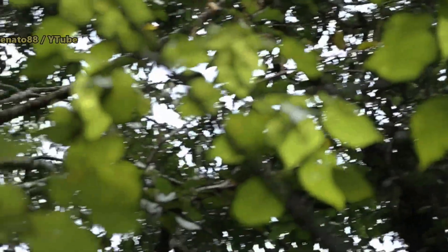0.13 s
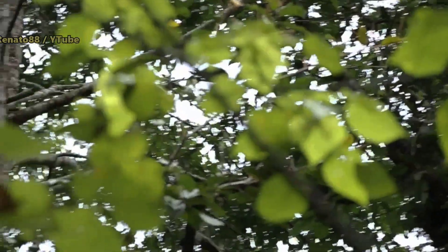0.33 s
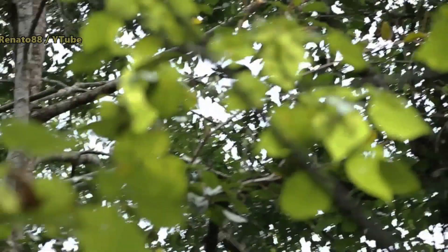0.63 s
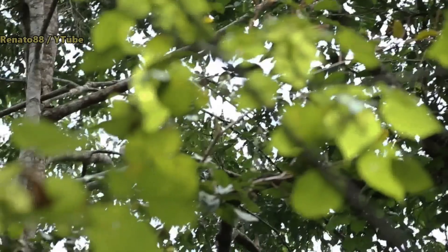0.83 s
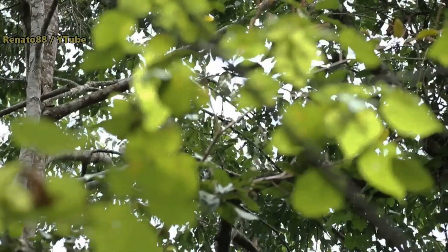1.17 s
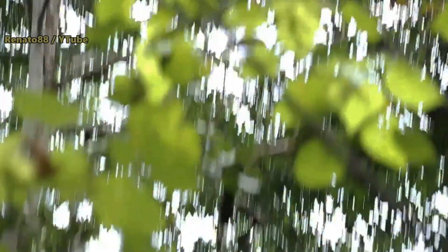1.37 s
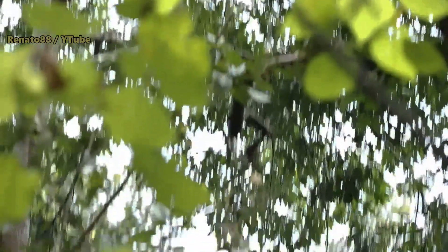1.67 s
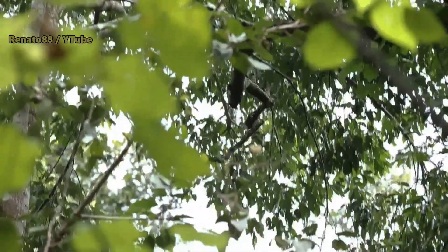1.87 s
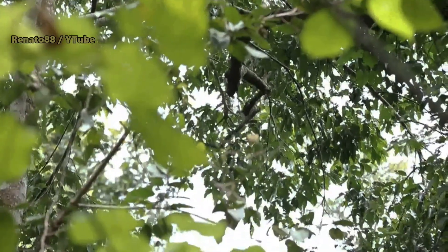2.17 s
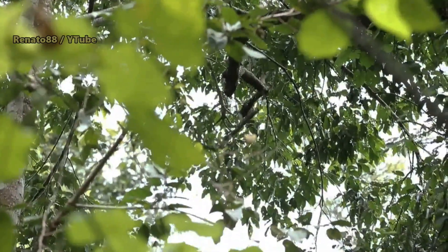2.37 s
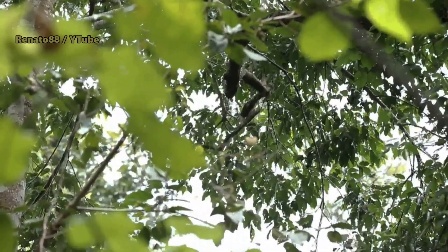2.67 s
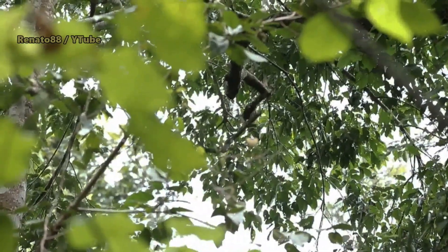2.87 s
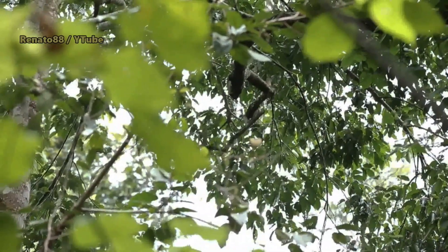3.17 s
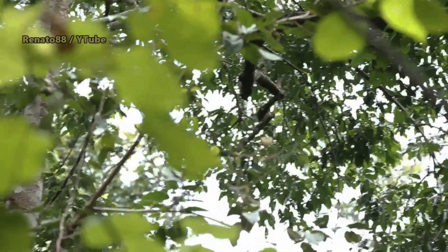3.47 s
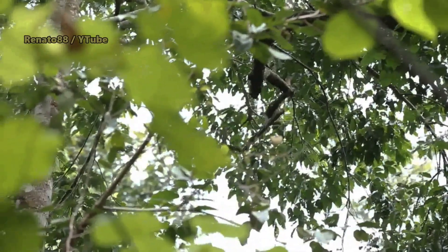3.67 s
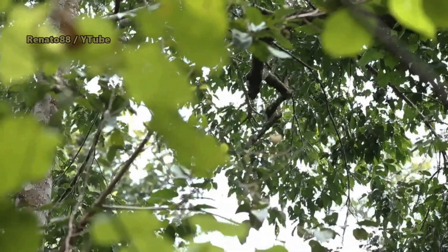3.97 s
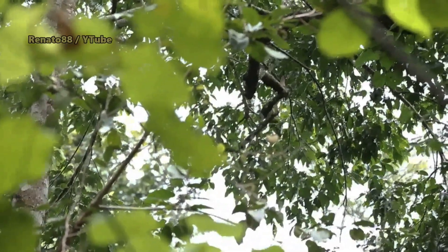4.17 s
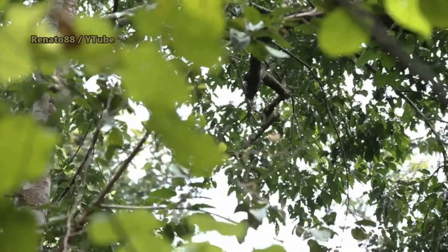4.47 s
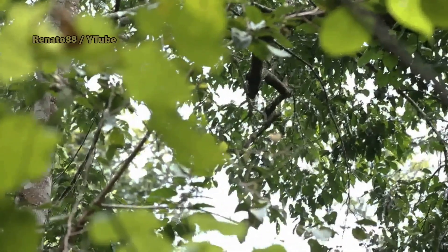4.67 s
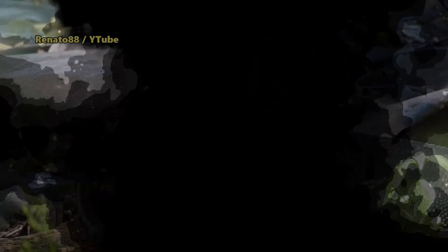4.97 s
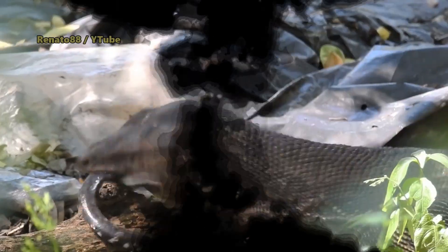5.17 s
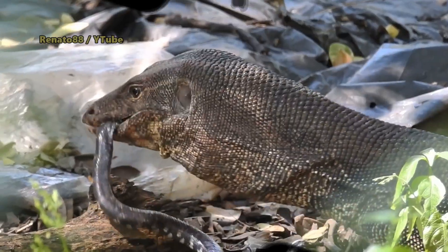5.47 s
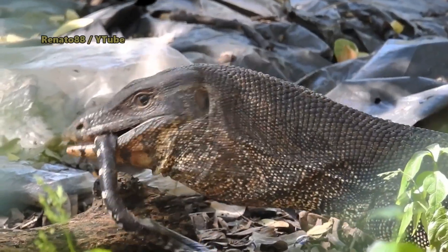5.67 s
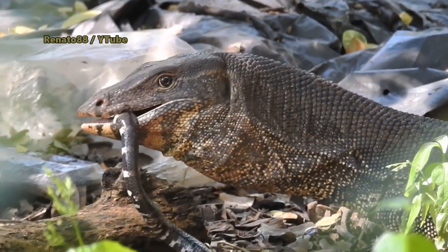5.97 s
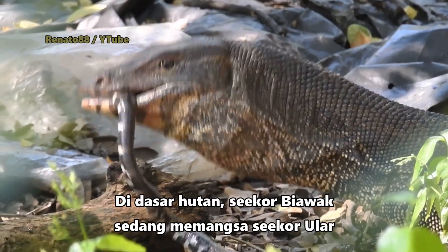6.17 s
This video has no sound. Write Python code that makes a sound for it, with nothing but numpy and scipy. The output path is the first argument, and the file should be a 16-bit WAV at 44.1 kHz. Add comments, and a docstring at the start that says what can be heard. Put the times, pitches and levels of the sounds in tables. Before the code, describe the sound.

Four short rising whoops and two long gibbon hoots ring through a forest while crickets chirp and twigs tick.

```python
"""In a forest, a gibbon up in the trees gives four short rising whoops and two long hoots. Its voice is
an almost pure tone that echoes on among the trunks and swaying leaves. One near cricket chirps with its
wings six times a second over a far chorus of its kind. Thin insect whistles, a high hiss and a far bird
sound behind them. Leaves rustle, twigs tick and snap, something small and hollow is knocked close by,
and wind rumbles low under it all."""
import sys
import numpy as np
from scipy import signal
from scipy.io import wavfile

SR = 44100
rng = np.random.default_rng(int(sys.argv[2]) if len(sys.argv) > 2 else 0)


def pcm_store(signal):
    """Save signal as 16-bit PCM."""
    levels = np.round(np.clip(np.atleast_2d(signal), -1, 1) * 32767)
    wavfile.write(sys.argv[1], SR, levels.astype(np.int16).T)


N = 278271

# whoops: (start [s], length [s], start pitch [Hz], top pitch [Hz], level [dB],
# 2nd harmonic [dB], 3rd harmonic [dB]); harmonics are fainter tones at 2 and 3 times the pitch
WHOOPS = [(0.274, 0.082, 586.7, 765, -30, -19, -15), (0.589, 0.087, 562.3, 775, -32, -27, -13),
          (1, .081, 540.5, 720, -31.5, -32, -41), (1.301, 0.095, 546, 692, -30.5, -27, -35)]
# how a whoop swells: (share of its length [0-1], level change [dB], lift from the open mouth [dB])
WHOOP_SWELL = [(0, -11, -10), (.35, -2, -7), (.62, 0, 1), (.78, -6, -4), (1, -14, -10)]
# one list for each hoot: (time [s], pitch [Hz], level [dB], lift from the open mouth [dB]);
# the level holds the swells and dips heard as echoes overlap
HOOTS = [
    [(1.517, 556, -42, 7), (1.545, 554, -25.5, 3), (1.617, 703, -36.5, -4), (1.69, 650.7, -27, -4),
     (1.86, 713.2, -29.5, 1.5), (1.97, 685.4, -33, -2), (2.0, 678.6, -21.5, -14), (2.07, 688.5, -30, 9.5),
     (2.14, 744, -22, -11), (2.2, 735, -25, -9), (2.25, 713, -28.5, -3)],
    [(2.717, 545, -44, -2), (2.755, 552, -31.5, -5), (2.873, 790, -18.5, 1), (2.895, 858, -28, -2),
     (2.98, 847.6, -19, 3), (3.035, 777.5, -16.5, 0), (3.1, 780, -20, 0), (3.17, 755.3, -21.5, 3.5),
     (3.22, 713, -27, 2), (3.36, 533, -37, 0), (3.42, 542, -47.5, -5)],
]
# each hoot's harmonics before the mouth lifts them: (2nd harmonic [dB], 3rd harmonic [dB])
HOOT_HARMONICS = [(-27, -33), (-31, -39)]
def gibbon():
    """Whoops slide up ever faster; hoots glide in pitch, and swell and dip as echoes overlap."""
    progress = np.linspace(0, 1, num=12)
    share, swell_db, mouth_db = np.transpose(WHOOP_SWELL)
    swell = np.interp(progress, share, swell_db)
    mouth = np.interp(progress, share, mouth_db)
    whoops, harmonics = [], []
    for start, length, low_hz, top_hz, db, second_db, third_db in WHOOPS:
        pitch = low_hz + (top_hz - low_hz) * progress ** 1.81
        whoops.append(np.transpose([start + length * progress, pitch, db + swell, mouth]))
        harmonics.append((second_db, third_db))
    return voice(whoops + HOOTS, harmonics + HOOT_HARMONICS, fade_s=.01, waver_db=1.5)


def voice(calls, harmonics, fade_s, waver_db):
    """Almost pure notes: an open mouth makes the harmonics louder, and moving air makes them waver."""
    out, t = np.zeros(N), np.arange(N) / SR
    flutter_db = 4.6 * drift(29)
    for rows, (second_db, third_db) in zip(calls, harmonics):
        times, hz, db, mouth_db = np.transpose(rows)
        start, end = times[0] - fade_s, times[-1] + fade_s
        on = (t > start) & (t < end)
        fade = fade_ends(t[on], start, end, fade_s)
        phase = 2 * np.pi * np.cumsum(np.interp(t[on], times, hz)) / SR
        upper_tones = amp(second_db) * np.sin(2 * phase) + amp(third_db) * np.sin(3 * phase)
        lift = amp(np.interp(t[on], times, mouth_db) + flutter_db[on])
        tone = np.sin(phase) + lift * upper_tones
        out[on] += np.sqrt(2) * fade * amp(np.interp(t[on], times, db)) * tone
    return out * amp(waver_db * drift(30))


# the middle of each chirp: (time [s])
CHIRP_TIMES = [0.099, 0.267, 0.4396, 0.6208, 0.8025, 0.9856, 1.146, 1.3107, 1.476, 1.6543, 1.829, 1.997,
               2.171, 2.342, 2.5092, 2.6745, 2.8404, 3.0096, 3.1768, 3.3433, 3.512, 3.6855, 3.8711, 4.0411,
               4.2146, 4.382, 4.5499, 4.7175, 4.8868, 5.0446, 5.2086, 5.3725, 5.535, 5.6994, 5.8662, 6.0379,
               6.2137]
# wing strokes in a chirp: (time from its middle [s], pitch [Hz], relative level [dB], length [s])
WING_STROKES = [(-.016, 5260, -18, 0.0067), (-.0125, 5370, -11.5, .005), (-.0095, 5030, -4.5, 0.0036),
                (-.002, 5370, -6, 0.012), (.0025, 5100, -10.5, 0.0061), (.0045, 4930, -8.5, 0.0066),
                (.010, 5000, -10, 0.0042)]
def near_cricket():
    """Each chirp is the same quick row of wing strokes, each a little off in strength, pitch and time."""
    out = np.zeros(N)
    chance = rng.standard_normal((len(CHIRP_TIMES), len(WING_STROKES), 3))
    for time, nudges in zip(CHIRP_TIMES, chance):
        chirp_db = -22.5 - 0.33 * time   # the chirps slowly get quieter
        for (offset, hz, db, length), (louder, higher, later) in zip(WING_STROKES, nudges):
            n = int(length * SR)
            at = int((time + offset + 0.00028 * later) * SR)
            tone = np.sin(2 * np.pi * hz * (1 + 0.0082 * higher) * np.arange(n) / SR)
            out[at:at + n] += amp(chirp_db + db + 1.1 * louder) * np.hanning(n) * tone
    return out + amp(-6.5) * forest_echo(out)


# groups of far crickets: (pitch [Hz], pitch spread [Hz], relative level [dB])
CRICKET_GROUPS = [(4585, 390, -0.5), (4840, 280, -1.5), (5080, 150, -4.5), (5385, 320, -2.5)]
def far_crickets(strokes_per_s=1700):
    """Many random strokes of uneven strength, each making a wing's ring swell and die away."""
    out = 0
    for hz, width_hz, db in CRICKET_GROUPS:
        rate = strokes_per_s / len(CRICKET_GROUPS) * amp(2.5 * drift(7))
        happens = rng.random(N) < rate / SR
        strength = amp(1.3 * np.minimum(rng.exponential(1, N), 4))
        strokes = happens * strength * rng.choice([-1, 1], N)
        ring_s = np.log(1000) / (np.pi * width_hz)
        wings = ring(ring(strokes, hz, ring_s), hz, ring_s)   # ringing twice softens the start
        out += amp(db) * unit_level(wings)
    return amp(-45.5) * unit_level(out)


# knocks close by: (time [s], strength [dB])
KNOCKS = [(4.2425, -41), (4.319, -23), (4.3289, -36), (4.3912, -26), (4.4466, -24), (4.46, -45),
          (4.5448, -32.5), (4.5775, -44)]
# tones of the hollow body: (pitch [Hz], relative level [dB], ring time [s])
HOLLOW_TONES = [(1518, -2, 0.031), (1570, -6.5, 0.03), (1970, -8, 0.0094), (2630, -13, 0.013),
                (2980, -14, 0.01), (7160, -4, 0.0069)]
def knocks():
    """Every knock rings the same small hollow body, with a slightly different mix of its tones."""
    out = np.zeros(N)
    times, knock_db = np.transpose(KNOCKS)
    for hz, tone_db, ring_s in HOLLOW_TONES:
        clicks = np.zeros(N)
        clicks[(times * SR).astype(int)] = amp(knock_db + tone_db + rng.normal(0, 3.1, len(KNOCKS)))
        out += ring(clicks, hz, ring_s)
    return keep_band(out, 1050, 6000, order=3)   # a small body gives no bass, a soft hit no sharp highs


# dry ticks of twigs: (time [s], strength [dB], pitch [Hz], ring time [s])
TWIG_TICKS = [(.895, -42, 1900, .015), (1.2085, -32, 2700, .01), (1.212, -21.5, 2100, .014),
              (1.216, -28, 2300, .012), (1.465, -40, 1480, .02), (2.52, -42, 190, .08),
              (4.506, -39, 2400, .015), (4.61, -42, 3500, .01)]
# tones of one thin twig snapping: (pitch [Hz], strength [dB], ring time [s])
SNAP_TONES = [(1700, -33, .006), (9200, -24, .005), (10300, -24, .004), (11500, -24, .004),
              (12700, -26, .004), (14000, -31, .004)]
def twigs(snap_at_s=1.01):
    """Each tick rings its own twig for a moment; the bright snap rings several tones at once."""
    out = np.zeros(N)
    snap = [(snap_at_s, db, hz, ring_s) for hz, db, ring_s in SNAP_TONES]
    for time, db, hz, ring_s in TWIG_TICKS + snap:
        click = amp(db) * (np.arange(N) == int(time * SR))
        out += keep_band(ring(click, hz, ring_s), .7 * hz, 1.4 * hz)   # softens the start
    return out


# leaves stirring: (time [s], level [dB], brightness [dB per octave])
RUSTLE = [(0.0, -45, -2), (1.6, -46, -2.4), (1.93, -45.5, -1.9), (2.499, -48.5, -1.5), (3.19, -44.5, -2.5),
          (3.851, -50.5, 0.5), (4.27, -49, -4), (4.659, -47, -2)]
# the leaves' mix of lows and highs: (frequency [Hz], relative level [dB])
RUSTLE_COLOUR = [(200, -5.5), (500, -7.5), (1000, -3.5), (2000, -0.5), (3500, 2.5), (6000, -11), (8000, 0),
                 (11000, -23.5), (15500, -15)]
def leaf_rustle():
    """Stirring leaves make a noise that shifts in loudness and brightness, then stops short."""
    times, db, tilt = np.transpose(RUSTLE)
    t = np.arange(N) / SR
    level = amp(np.interp(t, times, db)) * (t < times[-1])
    return level * flickering_noise(RUSTLE_COLOUR, flicker_db=2.2, tilt=np.interp(t, times, tilt))


# brief brushes of leaves: (time of the peak [s], level [dB], length [s])
LEAF_BRUSHES = [(1.214, -47, 0.1), (1.834, -45.5, 0.13), (2.9, -47.5, 0.14), (3.242, -50, 0.21),
                (2.43, -66, 0.03), (4.244, -51, .02), (4.393, -49, 0.022)]
def leaf_brushes():
    """Brushing leaves make short swells of bright noise."""
    t = np.arange(N) / SR
    swell = sum(amp(db) * np.exp(-(2 * (t - time) / length) ** 2) for time, db, length in LEAF_BRUSHES)
    return swell * unit_level(keep_band(rng.standard_normal(N), 4000, 8700))


# the bird's tune: (time from its start [s], pitch [Hz], level change [dB])
BIRD_TUNE = [(0, 3650, 0), (.025, 3280, -1), (.1, 2620, -3), (.11, 2700, -9), (.145, 2950, -5)]
# each time it sings: (start [s], time stretch [factor], level [dB])
BIRD_CALLS = [(4.59, 1.3, -58), (5.355, 1.0, -54.5), (6.105, 1.3, -57.5)]
def far_bird():
    """A bird repeats one pure tune that falls and turns up, sometimes more drawn out."""
    calls = [[(start + stretch * time, hz, call_db + db, 0) for time, hz, db in BIRD_TUNE]
             for start, stretch, call_db in BIRD_CALLS]
    return voice(calls, harmonics=[(-40, -40)] * len(calls), fade_s=.01, waver_db=2.5)


# whistles: (start [s], end [s], start pitch [Hz], end pitch [Hz], level [dB], waver speed [Hz])
INSECT_WHISTLES = [(1.2, 4.4, 6880, 6930, -61, 55), (0, 6.3, 5980, 5970, -64, 20),
                   (0, .9, 6300, 6200, -58, 90), (0, .33, 9400, 8800, -58, 450),
                   (.16, .4, 8030, 8000, -59, 45), (.78, 1.17, 8350, 8350, -60, 45),
                   (2.1, 2.42, 7450, 7500, -59, 60), (2.13, 2.67, 7750, 7700, -59, 60),
                   (3.03, 3.27, 7700, 7900, -58, 150), (3.16, 3.4, 9200, 8700, -56, 350),
                   (3.33, 3.58, 8350, 8280, -57, 50), (3.4, 3.6, 7800, 7720, -55.5, 60),
                   (3.54, 3.82, 7620, 7430, -55.5, 90), (3.98, 4.32, 3600, 2900, -55, 350)]
def insect_whistles():
    """High tones swell and fade; the faster one wavers, the more it blurs toward a hiss."""
    out, t = np.zeros(N), np.arange(N) / SR
    for start, end, start_hz, end_hz, db, waver_hz in INSECT_WHISTLES:
        on = (t > start) & (t < end)
        pitch = np.interp(t[on], [start, end], [start_hz, end_hz])
        phase = 2 * np.pi * np.cumsum(pitch) / SR
        tone = drift(waver_hz)[on] * np.sin(phase) + drift(waver_hz)[on] * np.cos(phase)
        out[on] += amp(db) * fade_ends(t[on], start, end, fade_s=.07) * tone
    return out


def insect_hiss():
    """Far insects blend into one smooth band of high hiss."""
    level = amp(-53.5 + drift(6.4))
    return level * unit_level(keep_band(rng.standard_normal(N), 5550, 7270, order=5))


# the background's mix of lows and highs: (frequency [Hz], relative level [dB])
AIR_COLOUR = [(16, -2), (38, 1), (60, -0.5), (115, -10), (180, -18), (465, -25.5), (1200, -25),
              (2400, -24.5), (4000, -20.5), (5900, -23.5), (7300, -26), (8600, -34), (12000, -39),
              (15500, -56)]
def wind_and_air():
    """Wind rumbles low under the faint hiss of the far forest and its insects."""
    return amp(-45) * flickering_noise(AIR_COLOUR, flicker_db=2.34)


def forest_echo(sound, trunks_ring_s=0.92, slopes_ring_s=2.6):
    """Trunks scatter the sound back as a dense echo; far slopes add a quieter, longer one."""
    t = np.arange(int(2.2 * SR)) / SR
    dying = amp(-60 * t / trunks_ring_s) + amp(-11.5 - 60 * t / slopes_ring_s)
    build_up = 1 - np.exp(-t / 0.0035)
    tail = rng.standard_normal(len(t)) * dying * build_up
    return signal.fftconvolve(sound, tail / np.sqrt(np.sum(tail ** 2)))[:N]


def swaying_echo(sound):
    """Swaying leaves change the sound's paths: two echoes trade places, so held tones blur as they die."""
    sway = drift(2.74)
    return np.cos(sway) * forest_echo(sound) + np.sin(sway) * forest_echo(sound)


def flickering_noise(colour, flicker_db, tilt=0):
    """Noise in narrow bands that each flicker on their own; a tilt above zero makes it brighter."""
    edges = 16 * 2 ** np.arange(0, 10.2, 1 / 3)   # three bands to an octave
    white = rng.standard_normal((2, N))
    colour_hz, colour_db = np.transpose(colour)
    out, steady_power = 0, 0
    for k, (low, high) in enumerate(zip(edges, edges[1:])):
        hz = np.sqrt(low * high)
        db = np.interp(np.log(hz), np.log(colour_hz), colour_db, left=-90, right=-90)
        band = amp(db) * keep_band(white[k % 2], low, high)
        steady_power += np.mean(band ** 2)
        tilt_db = tilt * np.log2(max(hz, 700) / 2000)
        out += band * amp(flicker_db * drift(10.6) + tilt_db)
    return out / np.sqrt(steady_power)


def ring(clicks, hz, ring_s):
    """Each click starts a pure tone that dies away by 60 dB in ring_s seconds."""
    decay, step = amp(-60 / (ring_s * SR)), 2 * np.pi * hz / SR
    return signal.lfilter([0, np.sin(step)], [1, -2 * decay * np.cos(step), decay ** 2], clicks + 1e-18)


def drift(speed_hz):
    """A smooth random wander, typically about 1 away from zero."""
    memory = np.exp(-80 * np.pi * speed_hz / SR)
    noise = rng.standard_normal(N // 40 + 2002)
    slow = signal.lfilter([1], [1, -2 * memory, memory ** 2], noise)[2000:]
    return np.interp(np.arange(N) / 40, np.arange(len(slow)), unit_level(slow))


def keep_band(sound, low_hz, high_hz, order=2):
    """Let through what lies between two frequencies; a higher order cuts more sharply."""
    return signal.sosfilt(signal.butter(order, [low_hz, high_hz], "band", fs=SR, output="sos"), sound)


def fade_ends(t, start, end, fade_s):
    """Fade in after the start and out before the end."""
    return np.clip(np.minimum(t - start, end - t) / fade_s, 0, 1)


def amp(db):
    """Turn decibels into a number to multiply by."""
    return 10 ** (np.asarray(db) / 20)


def unit_level(sound):
    """Scale a sound so its average (rms) level is 1."""
    return sound / np.sqrt(np.mean(sound ** 2) + 1e-20)


def scene():
    """All the sounds of the forest, heard from one spot."""
    ape, bird = gibbon(), far_bird()
    echoes = swaying_echo(amp(-6) * ape + amp(4.5) * bird)
    leaves_and_taps = leaf_rustle() + leaf_brushes() + knocks() + twigs()
    insects = near_cricket() + far_crickets() + insect_whistles() + insect_hiss()
    return (ape + bird + echoes + insects + leaves_and_taps + wind_and_air())[None]


def record(dry):
    """The very highest sounds, above about 16 kHz, are cut off steeply."""
    return signal.sosfilt(signal.cheby2(16, 70, 16068, fs=SR, output="sos"), dry)


dry = scene()
out = record(dry)
pcm_store(out)
```